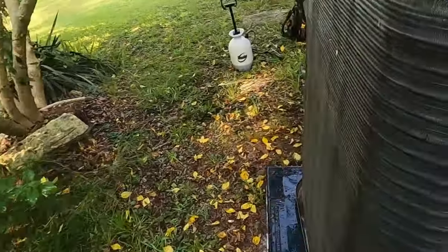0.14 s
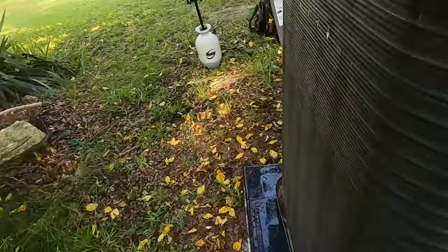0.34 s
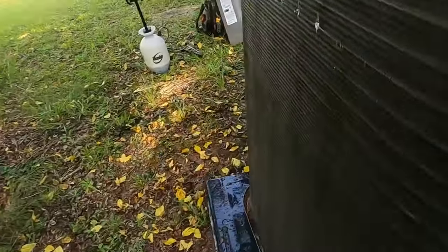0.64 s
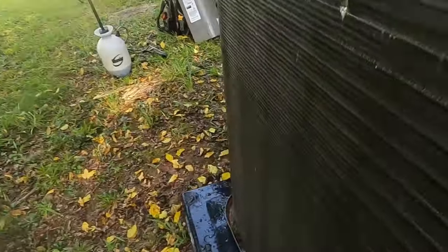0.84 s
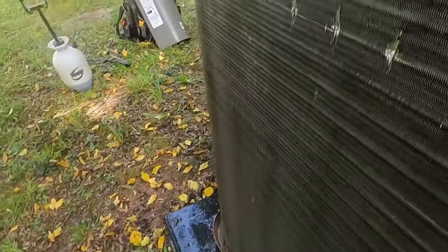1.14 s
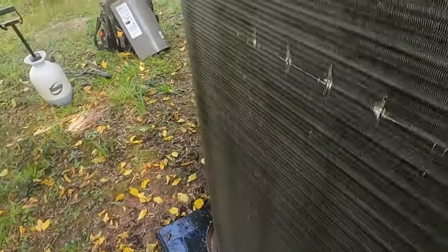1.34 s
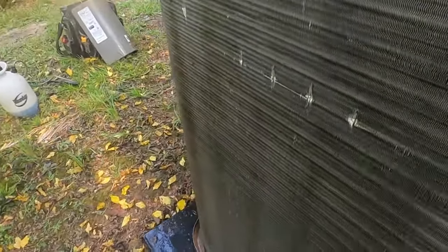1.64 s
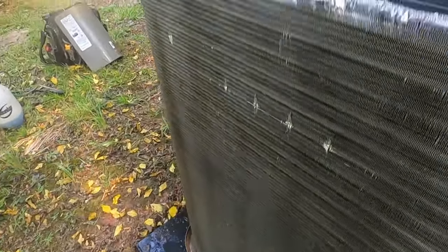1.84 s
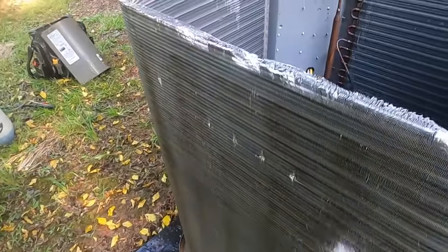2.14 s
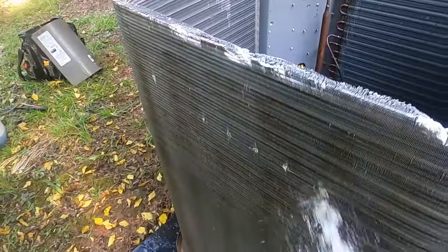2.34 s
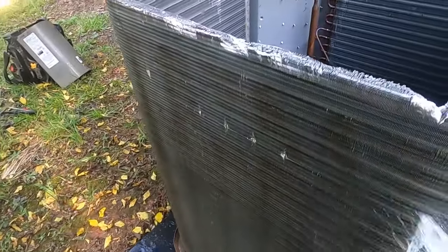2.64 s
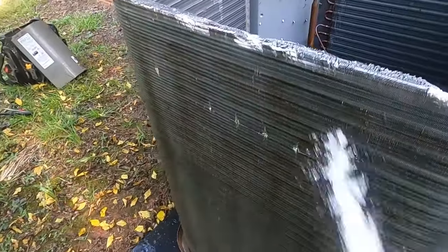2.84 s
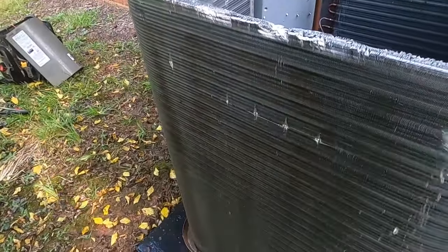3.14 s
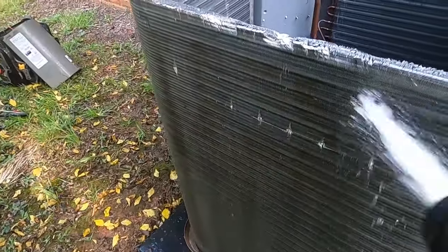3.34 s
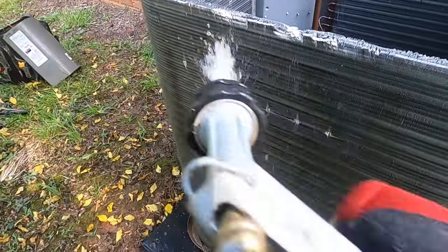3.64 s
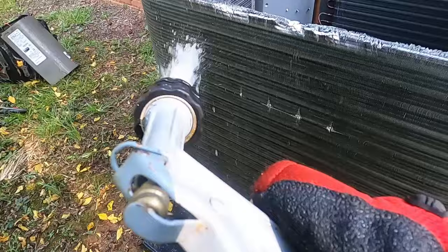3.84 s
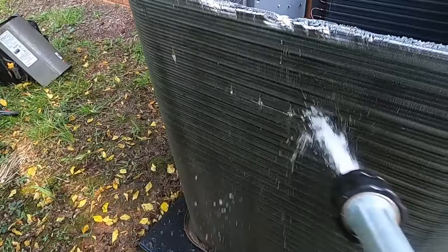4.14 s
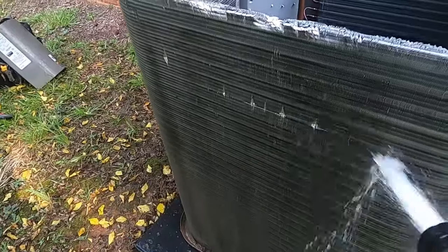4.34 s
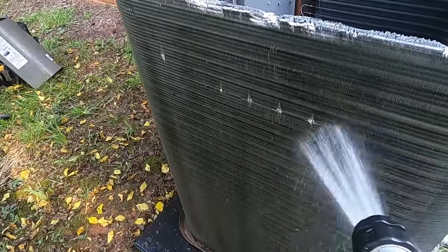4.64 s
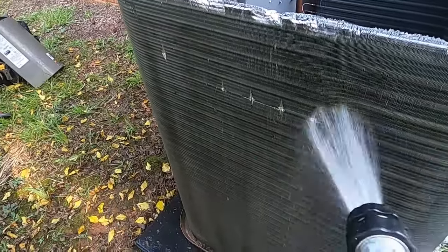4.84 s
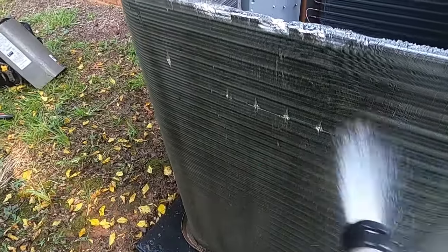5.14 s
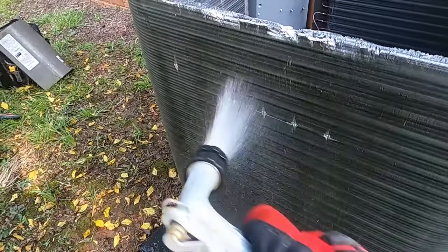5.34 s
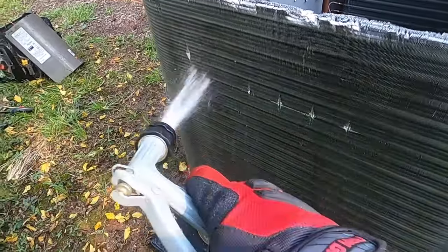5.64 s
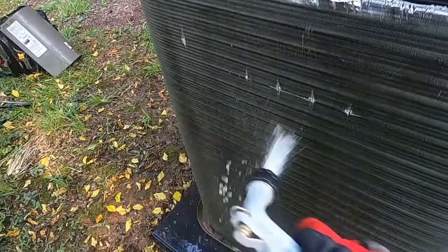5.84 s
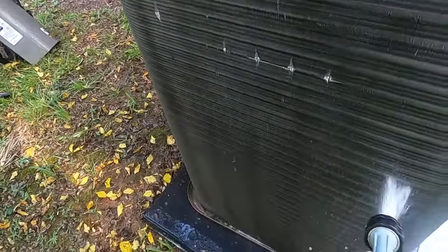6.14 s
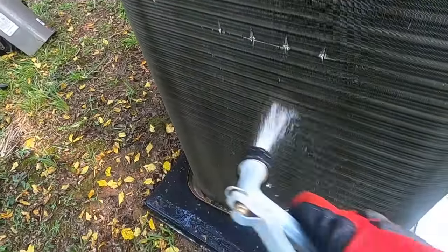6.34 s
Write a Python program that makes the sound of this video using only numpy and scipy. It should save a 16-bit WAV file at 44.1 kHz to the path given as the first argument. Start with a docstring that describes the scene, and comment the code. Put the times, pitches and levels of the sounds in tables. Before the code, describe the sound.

In an open yard, a brief wet squelch and gritty scuff come before a hose nozzle snaps open close to the microphone. A dense, bright jet churns and bubbles on metal fins with light coil drumming. At about four and a half seconds it widens to a finer fan, thins briefly to a hiss, then returns with a shifting airy note until the end.

```python
"""Outdoors, at the finned coil of an air conditioner, a garden hose an arm's length from a two-port microphone.
After a wet squelch and a scuff (gliding plops, gritty impacts) the nozzle opens: a tight jet of dense random
drops and ringing bubbles churns in the fins and drums on the coil. Later it widens to a fan of finer drops,
which briefly thins to a hiss, then sings through a moving resonance in the gaps between the fins.
Mist, sizzle, slaps of water, the hum of the hose, soft hand bumps and the open yard complete it."""
import sys
import numpy as np
from scipy import signal
from scipy.fft import rfft, irfft, next_fast_len
from scipy.io import wavfile
from scipy.ndimage import uniform_filter1d, map_coordinates

SR = 44100
rng = np.random.default_rng(int(sys.argv[2]) if len(sys.argv) > 2 else 0)


def generate_wav(signal):
    """Clip the signal to [-1, 1] and save it as 16-bit WAV at the path in sys.argv[1]."""
    frames = np.transpose(np.atleast_2d(signal))
    scaled = np.clip(frames, -1, 1) * 32767
    pcm = np.round(scaled).astype(np.int16)
    wavfile.write(sys.argv[1], SR, pcm)


N = 286650
TIME = np.arange(N) / SR  # s

# Open yard, spectrum: frequency_hz, density_db_per_hz
YARD_SPECTRUM = [(15, -43), (25, -3), (98, -8), (202, -2.5), (271, -5), (373, -4.5), (543, -20), (588, -34),
                 (1500, -8.5), (7680, -13), (15000, -64)]

# Hose and handle, resonances: centre_hz, width_hz, level_db
HOSE_MODES = [(360, 120, 8), (1620, 320, -5.5)]
# Surges of flow in the hose: start_s, end_s, level_db
HOSE_SURGES = [(0.024, .52, -49.5), (1.925, 2.237, -52), (3.53, 3.882, -53), (4.6, 5.9, -55.5)]
HOSE_REST_DB, HOSE_RISE_S, HOSE_FALL_S = -70.5, .05, 0.21

# Single plops and squelches: start_s, level_db, pitch_hz, life_s, glide_octaves_per_life
PLOPS = [(.061, -34.5, 380, .01, -0.32), (.077, -41, 1100, 0.0099, 0.005), (.081, -36, 366, 0.013, -0.064),
         (0.109, -27.5, 1847, 0.0137, -0.29), (.109, -34, 3420, 0.014, -0.041),
         (0.12, -25.5, 1196, 0.0041, -0.77), (.123, -35, 920, 0.0086, -.3), (.135, -34, 380, 0.0075, -0.86),
         (.863, -32.5, 420, 0.0063, -0.28), (.923, -29, 1340, 0.0092, 0.046),
         (1.001, -27, 880, 0.007, -0.072), (4.943, -31, 850, .006, -0.046)]
# Gritty scuffs, bell-shaped swells: centre_s, half_length_s, level_db
SCUFFS = [(0.113, 0.039, -43.5), (.177, 0.005, -40), (.189, 0.016, -36)]
# Grit of a scuff, spectrum: frequency_hz, density_db_per_hz
SCUFF_SPECTRUM = [(88, -34), (150, -18), (1230, -8), (1380, -11), (1580, -7), (1840, -10), (2100, -7.5),
                  (7770, -21), (14000, -65)]

# The water reaches the coil; its pressure then builds from a shortfall
OPEN_S, BUILD_DB, BUILD_S = .3765, 4.5, 0.013
# The low churn starts short and fills in
CHURN_LATE_DB, CHURN_FILL_S = 9, 0.012
# Where the water lands: time_s, left_minus_right_db
AIM = [(0.4, 0.5), (0.98, 0.5), (1.76, -1.5), (3.47, -2), (3.9, 1.5), (4.49, -1.5), (5.8, 1), (6.24, -1.5),
       (6.5, 0.5)]
# Tight jet on the fins, spectrum: frequency_hz, density_db_per_hz
JET_SPECTRUM = [(320, -58), (550, -28), (1320, -8), (1840, -7.5), (2500, 1.5), (3090, -2.5), (3990, -1.5),
                (5050, -8.5), (6050, -19.5), (8000, -22.5), (10400, -37), (17600, -120)]
# The jet slides off the middle of the coil and softens: centre_s, half_length_s, loss_db
GLANCES = [(1.522, 0.2, 3), (2.208, .3, 1), (2.674, 0.13, 1.6), (3.265, 0.18, 3), (4.45, 0.31, 1.7)]

# Fan on the fins, spectrum: frequency_hz, density_db_per_hz
FAN_SPECTRUM = [(530, -54), (900, -42), (1010, -25), (1060, -31), (1380, -26.5), (1600, -42), (1740, -15),
                (2590, -2.5), (3100, -2.5), (4440, -4.5), (7000, -21), (9100, -54), (15400, -120)]
# The nozzle is turned from jet to fan; FINE_SHARE is the power share of fine drops before the turn
WIDEN_S, WIDEN_TAKES_S, FINE_SHARE = 4.5, 0.12, 0.63
# How far the fan spreads: time_s, spread (0 narrow, 1 wide)
SPREAD = [(4.5, 0), (4.66, 0.57), (5.3, 0.7), (5.44, 1), (5.6, .6), (5.87, 0.66), (6.05, 0.12)]
# The fan briefly thins to mist: start_s, end_s, thinning_s, refilling_s
THIN = (4.69, 5.04, 0.024, 0.12)
THIN_LOSS_DB, THIN_MIST_DB = 10.5, 1
# The fan weakens as the nozzle sinks down the coil
FAN_SAG_DB_PER_S = 0.12
# Note of the fin gaps, set by the angle of the fan: time_s, pitch_hz
GAP_NOTE = [(4.6, 3270), (4.72, 2900), (5.02, 2970), (5.34, 2620), (5.6, 2900), (5.88, 3280), (5.98, 2850),
            (6.17, 3200), (6.5, 3063)]
# The tight jet floods the gaps and damps their note
GAP_WIDTH_HZ, GAP_RING_DB, JET_MUFFLES_DB = 430, 3.5, 3.5

# Base levels of the layers, and what a full spread adds
JET_DB, FAN_DB, FAN_SPREAD_DB = -21.5, -24.5, 0.5
MIST_DB, MIST_SPREAD_DB = -35, 3
SIZZLE_DB, SIZZLE_SPREAD_DB = -43.5, 12.5

# Mist around the stream, spectrum: frequency_hz, density_db_per_hz
MIST_SPECTRUM = [(240, -37), (400, -17.5), (664, -16.5), (728, -14.5), (1070, -8.5), (1170, -9.5),
                 (1410, -8), (2070, 1), (2480, -7.5), (4120, -4), (4380, -13), (6630, -17.5), (8600, -16.5),
                 (12600, -20), (15600, -31.5)]
# Mist follows the first water late, overshoots and settles
MIST_START_S, MIST_EARLY_DB, MIST_SURGE_DB, MIST_SETTLE_S = 0.443, -2.5, 5.5, 0.22
# A fan throws more mist than the jet does
FAN_MIST_DB = 0.6
# Finest spray of the thinned fan, spectrum: frequency_hz, density_db_per_hz
FINEST_SPRAY_SPECTRUM = [(1500, -14), (2000, 15), (2400, -3), (4600, 12), (6000, -15), (9000, -12),
                         (12300, -1), (15500, -12)]
FINEST_SPRAY_DB = -39

# Sizzle at the edge of the fan, spectrum: frequency_hz, density_db_per_hz
SIZZLE_SPECTRUM = [(4200, -25), (5300, -4), (5900, -4), (6900, -3), (7700, -10), (8500, -15.5),
                   (11000, -31)]
# The fins sizzle more when the water lands to the left
SIZZLE_DB_PER_AIM_DB = .7

# Coil under the water, resonances: centre_hz, width_hz, level_db
COIL_MODES = [(214.5, 33, 11.5), (370, 110, -14)]
# The stream catches the coil and it drums: centre_s, half_length_s, level_db
DRUM_ROLLS = [(3.04, .09, -51), (3.52, .09, -50), (3.75, .06, -54), (4.12, .05, -47), (4.28, .05, -50),
              (4.43, .05, -47), (4.76, .12, -48)]
DRUM_REST_DB = -64.5

# Bumps of the hand that holds the microphone: start_s, level_db, pitch_hz
BUMPS = [(.39, -42, 40.4), (1.08, -52, 54.6), (2.429, -51, 54.5), (3.95, -49, 34), (5.86, -41, 40.4)]
# Slugs of water that slap the fins: start_s, level_db, centre_hz
SLAPS = [(2.481, -23, 6000), (3.446, -20, 6100), (4.594, -25, 5000), (4.818, -19, 2100), (6.055, -22, 1950)]
# A higher note of the fin gaps: start_s, end_s, fade_s, first_pitch_hz
UPPER_NOTE = (5.0, 5.6, .1, 4750)
UPPER_RISE_HZ_PER_S, UPPER_NOTE_DB = 1060, -30

# Likeness of the two microphone ports: frequency_hz, likeness (0 to 1)
PORT_LIKENESS = [(30, .2), (70, .6), (200, .82), (1000, .93), (3300, .95), (5200, .87), (6200, .7),
                 (9500, .62), (14000, .3)]
# Balance of the two ports: frequency_hz, left_minus_right_db
PORT_TILT = [(30, 1), (300, 1.5), (1200, -1), (3000, 0.9), (6200, 0.5), (7700, 7), (8500, -3.5), (9400, 2),
             (11500, -9)]
# Treble colour of the ports: frequency_hz, gain_db
PORT_COLOUR = [(5200, 0), (5650, 0), (6000, -3.2), (7000, -2), (7800, 1.5), (8150, -5.5), (9100, -1.5)]
TOP_HZ = 15790  # band limit of the microphone


def amp(db):
    """Decibels to an amplitude factor."""
    return 10 ** (np.asarray(db) / 20)


def unit(x):
    """x at rms 1."""
    return x / np.sqrt(np.mean(x ** 2) + 1e-20)


def along(points, hz):
    """Interpolate (frequency_hz, value) points on a log frequency axis."""
    point_hz, value = np.transpose(points)
    return np.interp(np.log(hz + 1), np.log(point_hz + 1), value)


def curve(points):
    """Interpolate (time_s, value) points to one value per sample."""
    return np.interp(TIME, *np.transpose(points))


def wobble(rate):
    """A smooth random curve, rate knots a second."""
    knots = rng.standard_normal(int(N * rate / SR) + 4)
    return map_coordinates(knots, [TIME * rate])


def held(start, end, rise, fall):
    """Rises from 0 at start, holds at 1, and is back to 0 at end."""
    return np.clip(np.minimum((TIME - start) / rise, (end - TIME) / fall), 0, 1)


def bells(rows):
    """Bell-shaped time curves with their values, from (centre_s, half_length_s, value) rows."""
    return [(np.exp(-((TIME - centre) / length) ** 2), value) for centre, length, value in rows]


def swells(rows):
    """The summed gain of bell-shaped swells, their values in dB."""
    return sum(amp(db) * bell for bell, db in bells(rows))


def filtered(x, response):
    """x times a complex response of frequency."""
    size = next_fast_len(N + SR // 2)
    hz = np.fft.rfftfreq(size, 1 / SR)
    return irfft(rfft(x, size) * response(hz), size)[..., :N]


def coloured(x, spectrum):
    """x shaped by the given spectrum, at rms 1."""
    return unit(filtered(x, lambda hz: amp(along(spectrum, hz))))


def resonate(x, modes):
    """x through parallel band-pass resonances of alternating sign, at rms 1."""
    def response(hz):
        total = 0
        for k, (centre, width, db) in enumerate(modes):
            damping = 1j * hz * width
            total = total + (-1) ** k * amp(db) * damping / (centre ** 2 - hz ** 2 + damping)
        return total
    return unit(filtered(x, response))


def resonance_gain(hz, centre, width):
    """The bell-shaped gain of one resonance."""
    return 1 / (1 + (2 * (hz - centre) / width) ** 2)


def noise():
    """Two unrelated white noises."""
    return rng.standard_normal((2, N))


def drops(rate, scatter_db):
    """Two trains of impacts at random moments, rate a second, with random signs and log-normal sizes."""
    hits = rng.random((2, N)) < rate / SR
    return unit(hits * np.sign(noise()) * amp(scatter_db * noise()))


def reshape(x, gain):
    """x times a gain that depends on frequency and time."""
    hz, t, z = signal.stft(x, SR, nperseg=512)
    return signal.istft(z * gain(hz[:, None], t), SR, nperseg=512)[1][:, :N]


def patchy(x, depth_db):
    """Patches of the spectrum swell and fade as the water meets new fins."""
    def gain(hz, t):
        field = rng.standard_normal((len(hz), len(t)))
        field = uniform_filter1d(field, size=5, axis=0)  # across frequency
        field = uniform_filter1d(field, size=7, axis=1)  # across time
        return amp(depth_db * unit(field))
    return reshape(x, gain)


def plop(hz, life, glide, rough):
    """A pocket of air or a soft knock: swells, rings while gliding in pitch, and dies."""
    age = np.arange(int(4 * life * SR)) / SR / life  # in lives
    # the pitch strays from one cycle to the next
    stray = uniform_filter1d(rng.standard_normal(len(age)), size=int(SR / hz) + 1)
    stray = rough * stray * np.sqrt(hz / SR)
    pitch = hz * 2 ** (glide * np.minimum(age, 2))
    phase = np.cumsum(2 * np.pi * pitch / SR + stray)
    shape = age ** 2 * np.exp(-5 * age)
    return shape / shape.max() * np.sin(phase)


def add(track, start, sound):
    """Mix a short sound into a track, in place."""
    part = track[max(int(start * SR), 0):][:len(sound)]
    part += sound[:len(part)]


def yard():
    """Open air: noise with a low rumble and a broad hiss, its level wandering."""
    return amp(-49.0 + 2.6 * wobble(12)) * coloured(noise(), YARD_SPECTRUM)


def hose_hum():
    """Flow noise excites the resonances of the hose and handle, louder in each surge."""
    flow = amp(HOSE_REST_DB)
    for start, end, db in HOSE_SURGES:
        flow = flow + amp(db) * held(start, end, HOSE_RISE_S, HOSE_FALL_S)
    return flow * resonate(noise(), HOSE_MODES)


def squelches():
    """Pockets of air plop as gliding, rough tones, and air fizzes out as a short swell of noise."""
    fizz = coloured(noise(), [(2000, -20), (6000, 4), (13000, -4), (16000, -20)])
    out = swells([(.105, .025, -52)]) * fizz
    for start, db, hz, life, glide in PLOPS:
        add(out[0], start, amp(db) * plop(hz, life, glide, rough=0.64))
    return out


def scuffs():
    """Grit rubs as swells of small random impacts."""
    return swells(SCUFFS) * coloured(drops(rate=4000, scatter_db=1.0), SCUFF_SPECTRUM)


def bubbles(count, centre_hz, spread, cycles, scatter_db):
    """Air beaten into the water film rings briefly, rising in pitch."""
    out = np.zeros(N)
    starts = rng.uniform(0, N / SR, count)
    draws = np.clip(rng.standard_normal((count, 2)), -2, 2)
    for start, (pitch, size) in zip(starts, draws):
        hz = centre_hz * np.exp(spread * pitch)
        add(out, start, amp(scatter_db * size) * plop(hz, cycles / hz, glide=0.13, rough=0))
    return unit(out)


def jet(bright_db):
    """Dense heavy drops hit the fins and bubbles ring in the churn; brighter as the jet swings left."""
    water = coloured(patchy(drops(rate=10000, scatter_db=4.5), depth_db=2.0), JET_SPECTRUM)
    water[0] += amp(-20) * bubbles(count=2000, centre_hz=3192, spread=0.283, cycles=17, scatter_db=-1.5)
    water[0] += amp(-22.0) * bubbles(count=1200, centre_hz=1404, spread=0.2, cycles=4.6, scatter_db=3)

    def brightness(hz, t):
        treble = along([(2500, -0.2), (3800, -0.5), (5000, 0.45)], hz)
        return amp(bright_db * treble * np.interp(t, *np.transpose(AIM)))
    return amp(1.0) * reshape(water, brightness)


def fan(gap_hz, widened):
    """Finer drops excite the gaps between the fins; their note follows the angle of the nozzle."""
    water = coloured(patchy(drops(rate=14000, scatter_db=2), depth_db=0.5), FAN_SPECTRUM)
    ring = amp(GAP_RING_DB - JET_MUFFLES_DB * (1 - widened))

    def gap_gain(hz, t):
        note = resonance_gain(hz, np.interp(t, TIME, gap_hz), GAP_WIDTH_HZ)
        return 1 + np.interp(t, TIME, ring) * note
    return unit(reshape(water, gap_gain))


def first_splash(water):
    """The first water mostly hisses; the low churn builds as the fins flood."""
    def gain(hz, t):
        lows = along([(1300, 0.9), (2600, 0)], hz)
        unfilled = np.exp(-np.maximum(t - OPEN_S, 0) / CHURN_FILL_S)
        return amp(-CHURN_LATE_DB * lows * unfilled)
    return reshape(water, gain)


def mist(spread, thin):
    """Fine drops hiss around the stream: a surge after opening, and more from a wide or thinned fan."""
    age = TIME - MIST_START_S
    surge_db = np.interp(age, [-.025, .025], [MIST_EARLY_DB, MIST_SURGE_DB])
    surge_db = surge_db * np.exp(-np.maximum(age, 0) / MIST_SETTLE_S)
    level_db = MIST_DB + surge_db + MIST_SPREAD_DB * spread + THIN_MIST_DB * thin + 0.16 * wobble(4)
    hiss = coloured(patchy(drops(rate=16000, scatter_db=4.0), depth_db=1.6), MIST_SPECTRUM)
    return amp(level_db) * hiss + amp(FINEST_SPRAY_DB) * thin * coloured(noise(), FINEST_SPRAY_SPECTRUM)


def sizzle(spread, aim_db):
    """Scattered drops at the edge of the fan sizzle, more when it is wide or lands to the left."""
    level_db = SIZZLE_DB + SIZZLE_SPREAD_DB * spread + SIZZLE_DB_PER_AIM_DB * aim_db
    edge = coloured(patchy(drops(rate=13000, scatter_db=7.0), depth_db=2.0), SIZZLE_SPECTRUM)
    return amp(level_db) * edge


def spray():
    """Jet and fan share the flow; mist hisses around both and the fan's edge sizzles."""
    spread, aim_db, gap_hz = curve(SPREAD), curve(AIM), curve(GAP_NOTE)
    widened = np.clip((TIME - WIDEN_S) / WIDEN_TAKES_S, 0, 1)
    thin = held(*THIN)
    fine = np.clip(FINE_SHARE + (1 - FINE_SHARE) * widened, 0, 1)
    valve = 1 / (1 + np.exp(np.clip((OPEN_S - TIME) / .001, -50, 50)))

    glance_db = sum(loss * bell for bell, loss in bells(GLANCES))
    build_db = BUILD_DB * np.exp(-np.maximum(TIME - OPEN_S, 0) / BUILD_S)
    jet_db = JET_DB - glance_db - build_db
    fan_db = FAN_DB + FAN_SPREAD_DB * spread - THIN_LOSS_DB * thin - FAN_SAG_DB_PER_S * (TIME - WIDEN_S)

    water = np.sqrt(1 - fine) * jet(bright_db=3.0) + np.sqrt(fine) * fan(gap_hz, widened)
    impact = amp((1 - widened) * jet_db + widened * fan_db) * first_splash(water)
    haze = amp(FAN_MIST_DB * widened) * mist(spread, thin)
    edge = fine * (sizzle(spread, aim_db) + upper_note())
    # the stream breaks into slugs, so everything flutters together
    flutter = amp(0.37 * wobble(20) + .35 * wobble(130))
    return valve * flutter * (impact + haze + edge)


def ricochet(x, delay_s, swing_s, echo_db):
    """The wet coil face throws back a copy whose delay shifts as the nozzle moves."""
    late = TIME - delay_s - swing_s * wobble(3)
    echo = np.array([map_coordinates(row, [late * SR], mode="nearest") for row in x])
    return (x + amp(echo_db) * echo) / np.hypot(1, amp(echo_db))


def coil_drum():
    """Sparse heavy drops excite the coil's resonances, in rolls where the stream catches it."""
    rolls = amp(DRUM_REST_DB) * (TIME > OPEN_S) + swells(DRUM_ROLLS)
    return rolls * amp(wobble(12)) * resonate(drops(rate=1400, scatter_db=6.5), COIL_MODES)


def bumps():
    """The hand bumps softly: low, rough, short tones."""
    out = np.zeros((2, N))
    for start, db, hz in BUMPS:
        add(out[0], start, amp(db) * plop(hz, life=.05, glide=0, rough=0.77))
    return out


def slaps():
    """Bigger slugs of water: short bursts of noise around one pitch, dying 60 dB in 40 ms."""
    out = np.zeros((2, N))
    for start, db, hz in SLAPS:
        age = TIME - start
        spectrum = [(hz / 8, -35), (hz / 2.5, -15), (hz, 0), (hz * 1.15, -7), (hz * 1.4, -28), (hz * 3, -70)]
        attack = np.clip(age / .0005, 0, 1)
        out += amp(db - 60 * np.abs(age) / .04) * attack * coloured(noise(), spectrum)
    return out


def upper_note():
    """Drops excite a higher gap note that rises as the nozzle sweeps along the coil."""
    start, end, fade, first_hz = UPPER_NOTE

    def band(hz, t):
        pitch = first_hz + UPPER_RISE_HZ_PER_S * (np.clip(t, start, end) - start)
        return resonance_gain(hz, pitch, width=1400) ** 2
    tone = unit(reshape(drops(rate=12000, scatter_db=0), band))
    return amp(UPPER_NOTE_DB) * held(start, end, fade, fade) * tone


def ports(pair, lag_s):
    """The first row reaches both ports, the left one later; the second is scattered sound, opposite in each."""
    def response(hz):
        alike = np.clip(along(PORT_LIKENESS, hz), 0, 1)
        lean = amp(along(PORT_TILT, hz) / 2)
        turn = np.arccos(alike) / 2
        lag = np.exp(1j * np.pi * hz * lag_s)  # half the lag for each port
        left = lean / lag * np.array([np.cos(turn), np.sin(turn)])
        right = lag / lean * np.array([np.cos(turn), -np.sin(turn)])
        centre = np.linalg.norm((left + right) / 2, axis=0)
        return np.array([left, right]) / centre  # the centre keeps its level
    return filtered(pair, response).sum(axis=1)


def scene():
    """Yard, hose, hand, water and coil at the two ports, all swaying with the aim."""
    hand = squelches() + scuffs() + bumps()
    water = ricochet(spray(), delay_s=0.001391, swing_s=0.00014, echo_db=-22.5)
    sources = yard() + hose_hum() + hand + water + coil_drum() + slaps()
    sway = amp(np.outer([.5, -.5], curve(AIM)))
    return sway * ports(sources, lag_s=4.5e-5)


def record(dry):
    """The ports colour the treble, and the microphone passes nothing above its band limit."""
    return filtered(dry, lambda hz: amp(along(PORT_COLOUR, hz)) * (hz < TOP_HZ))


dry = scene()
out = record(dry)
generate_wav(out)
```